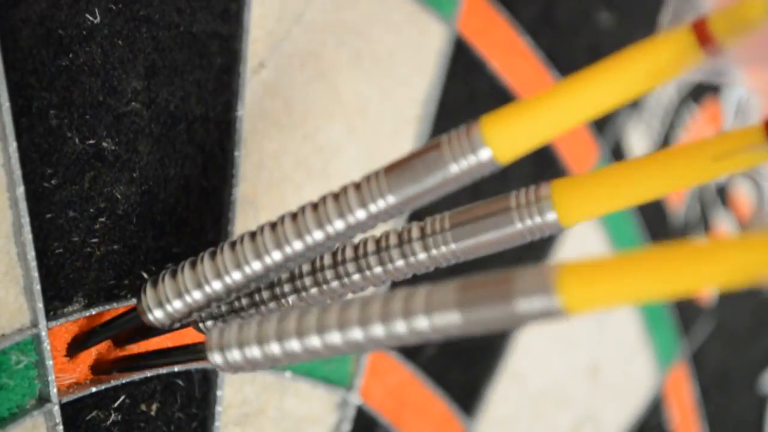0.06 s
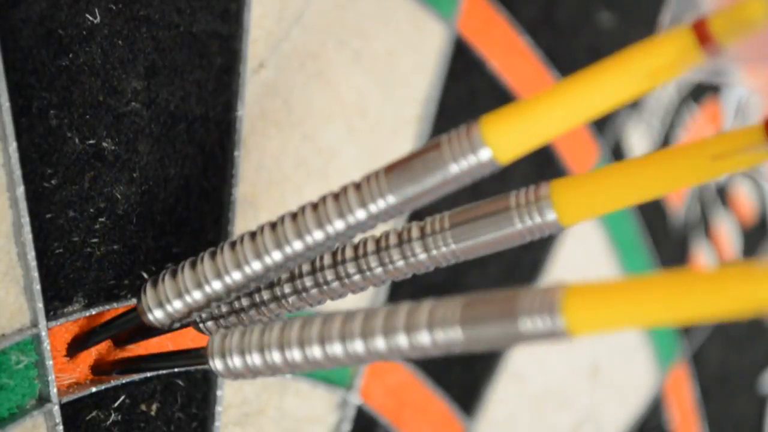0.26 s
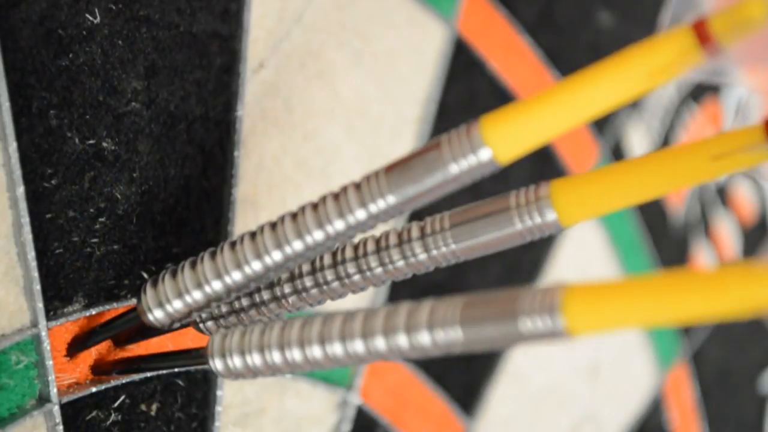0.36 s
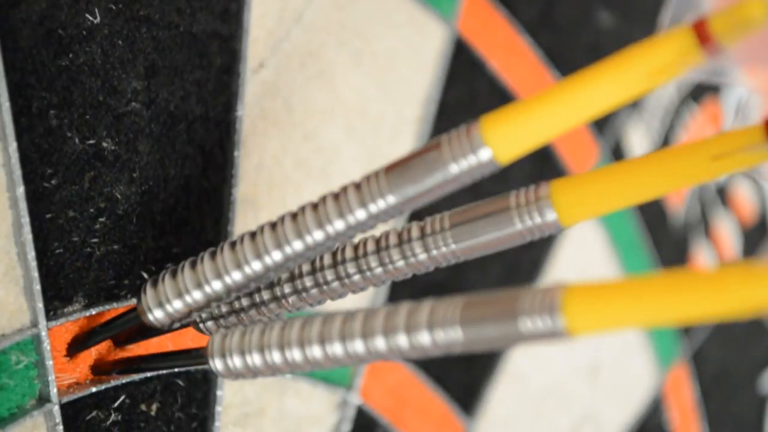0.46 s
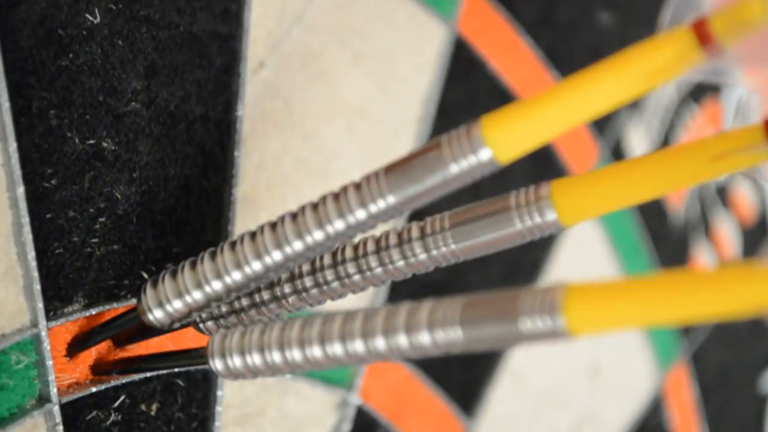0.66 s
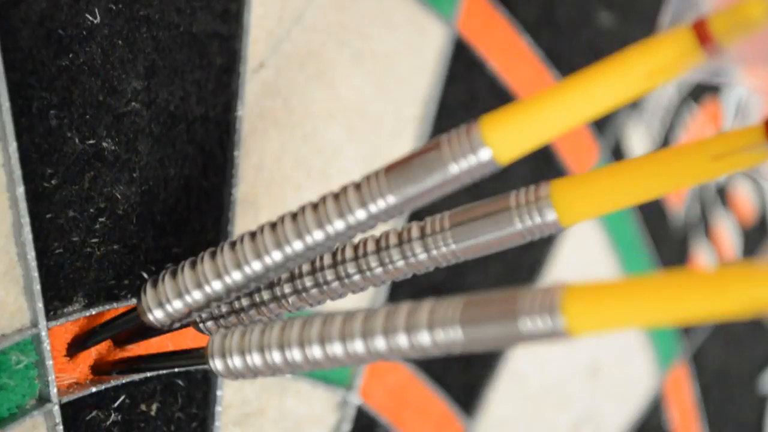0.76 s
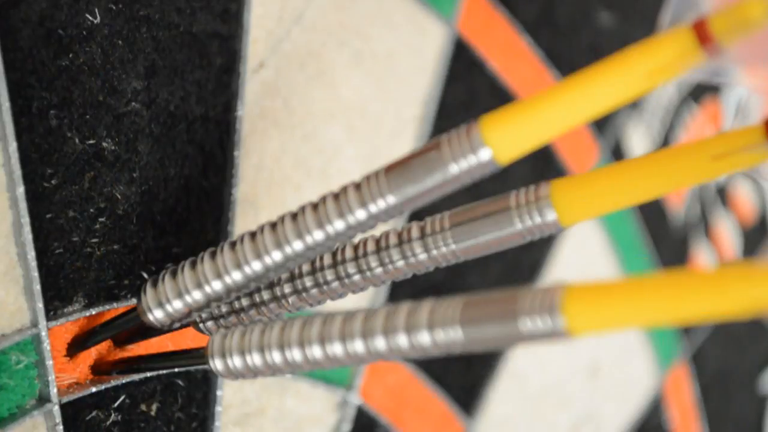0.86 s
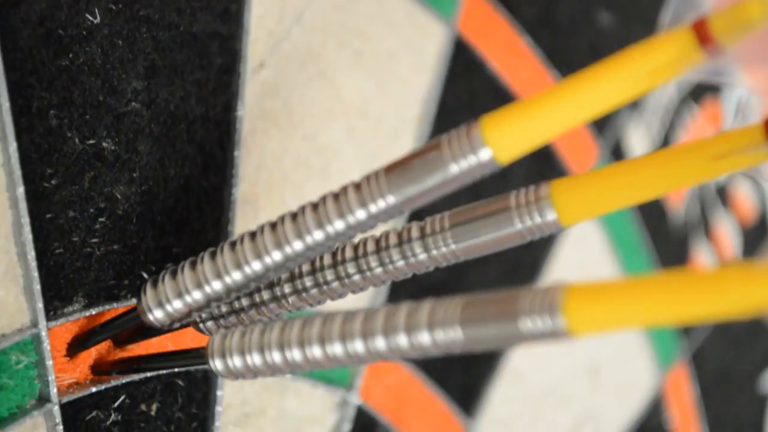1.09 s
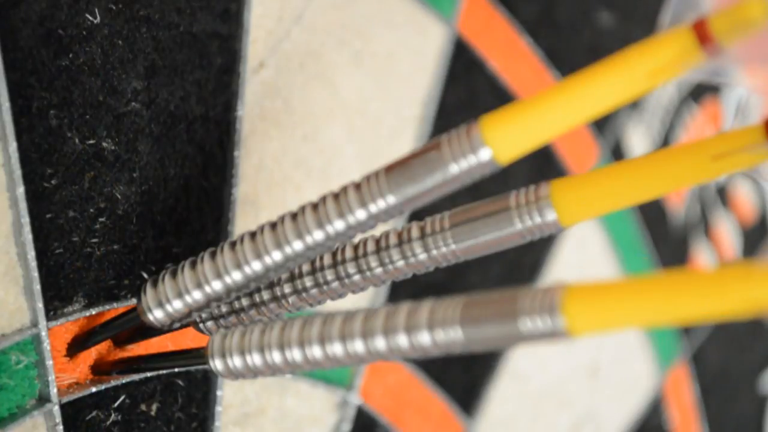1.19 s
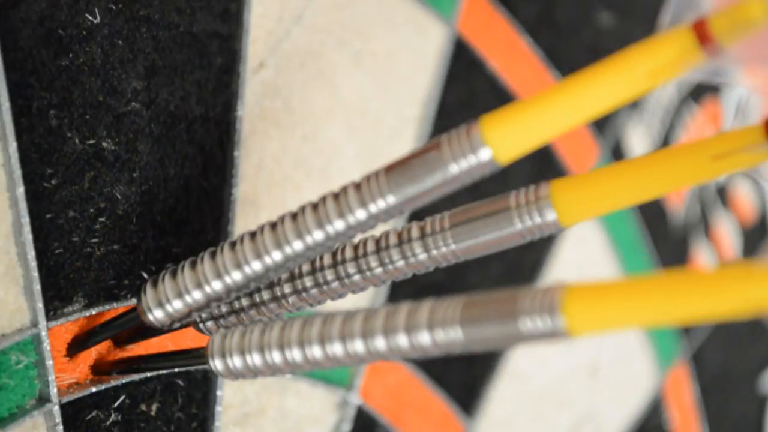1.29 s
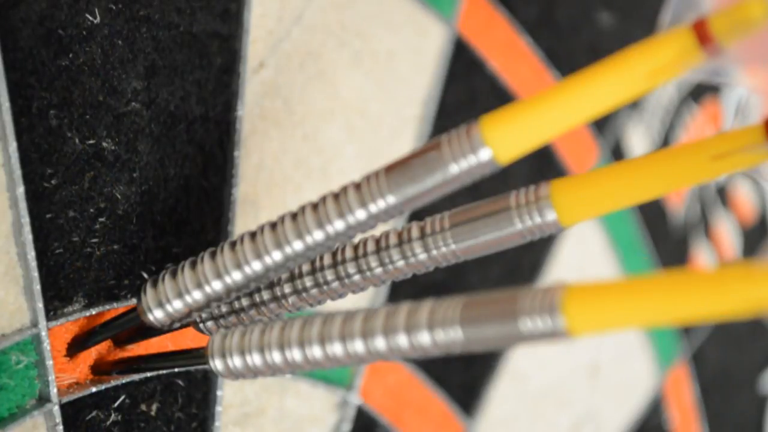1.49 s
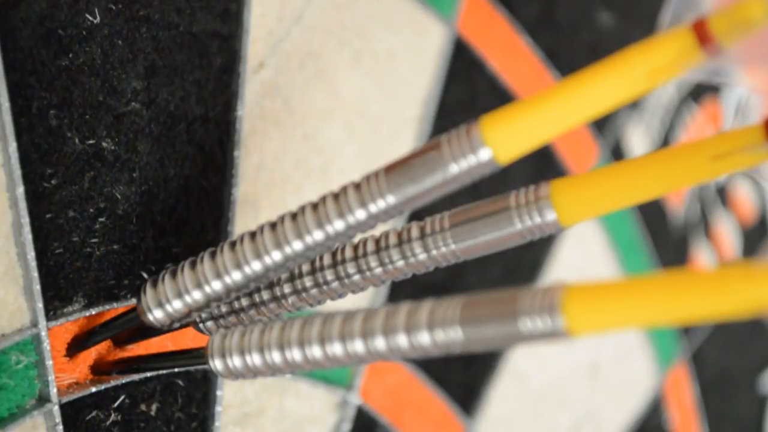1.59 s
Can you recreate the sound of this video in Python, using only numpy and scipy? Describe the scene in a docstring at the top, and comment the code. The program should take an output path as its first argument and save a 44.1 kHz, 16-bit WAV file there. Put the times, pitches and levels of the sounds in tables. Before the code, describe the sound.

A steel-tipped dart thuds sharply into a bristle dartboard beside other darts, then near silence

```python
"""Dart into a bristle board

Small room, microphone right beside the board: a steel-tipped dart lands and overloads the microphone.
The point crunches in (shaped noise) and the barrel clatters on darts already there (ringing modes).
The board knocks, its mount answers late with a hollow thud, and the room reflects the hit (fading noise).
Behind it lie a low wavering hum (sines), room hiss, and faint handling taps and thin chirps (noise puffs)."""
import sys
import numpy as np
from scipy import signal
from scipy.fft import rfft, irfft
from scipy.io import wavfile

SR = 44100
rng = np.random.default_rng(int(sys.argv[2]) if len(sys.argv) > 2 else 0)


def wav_record(signal):
    """Record a signal, one row per channel, as 16-bit PCM in the file named by sys.argv[1]."""
    frames = np.transpose(np.atleast_2d(signal))
    bounded = np.clip(frames, -1, 1)
    # unit amplitude maps onto the largest positive 16-bit level
    quanta = np.round(bounded * 32767).astype(np.int16)
    wavfile.write(sys.argv[1], SR, quanta)


N = 72765
TIME = np.arange(N) / SR


def from_db(db):
    """Decibels to gain."""
    return 10 ** (np.asarray(db) / 20)


def rms_one(x):
    """Scale to unit rms."""
    return x / np.sqrt(np.mean(x ** 2) + 1e-20)


def at_hz(points, hz):
    """Read a spectrum table on a log-frequency axis."""
    table_hz, value = np.transpose(points)
    return np.interp(np.log(hz), np.log(table_hz), value)


def level_over_time(points):
    """Gain along the scene, straight in dB between the points."""
    return from_db(np.interp(TIME, *np.transpose(points)))


def drift(rate_hz):
    """Slow random motion with spread near 1: white noise through two equal one-pole low-passes."""
    r = np.exp(-2 * np.pi * rate_hz / SR)
    slow = signal.lfilter([1], [1, -2 * r, r * r], rng.standard_normal(2 * N))
    return rms_one(slow[N:])  # the first half lets the filter settle


def noise_bands():
    """Third-octave bands of white noise: (centre Hz, band)."""
    edges = 1000 * 2 ** (np.arange(-16, 14) / 3)
    white = rng.standard_normal((2, 2 * N))  # neighbouring bands take different noise
    for k, (low, high) in enumerate(zip(edges, edges[1:])):
        band_pass = signal.butter(2, [low, high], "band", fs=SR, output="sos")
        yield np.sqrt(low * high), signal.sosfilt(band_pass, white[k % 2])[N:]


def coloured(spectrum):
    """Steady noise with a given spectrum; rms 1."""
    hz = np.maximum(np.arange(N // 2 + 1) * SR / N, 1)
    shaped = rfft(rng.standard_normal(N)) * from_db(at_hz(spectrum, hz))
    return rms_one(irfft(shaped, N))


def since(s):
    """Time since a moment, zero before it."""
    return np.maximum(TIME - s, 0)


def burst(s, attack_s, decay_s):
    """Envelope with a straight rise and an exponential fall to 1/e per decay time."""
    return np.minimum(since(s) / attack_s, 1) * np.exp(-since(s + attack_s) / decay_s)


def strike(s, modes, spread_db=0):
    """One blow sets every mode ringing, its strength varied at random by spread_db."""
    t = since(s)
    ring = np.zeros(N)
    for hz, db, t60 in modes:
        strength_db = db + spread_db * rng.standard_normal()
        ring += from_db(strength_db - 60 * t / t60) * np.cos(2 * np.pi * hz * t)
    return (t > 0) * ring


def puffs(rows, width):
    """Small soft sounds: noise passed twice through a resonance; width is bandwidth / centre per pass."""
    out = np.zeros(N)
    for s, db, hz, attack_s, decay_s in rows:
        b, a = signal.iirpeak(hz, 1 / width, fs=SR)
        once = signal.lfilter(b, a, rng.standard_normal(N))
        puff = signal.lfilter(b, a, once)
        out += from_db(db) * burst(s, attack_s, decay_s) * rms_one(puff)
    return out


# colour of the room hiss: (frequency [Hz], relative level per Hz [dB])
HISS_SPECTRUM = [(25, 2), (60, 11), (150, 4.5), (300, -1), (700, -2.5), (1400, -3), (2800, -6),
                 (5500, -10.5), (8000, -11), (10500, -11.5), (15500, -18)]
# loudness of the hiss at the microphone: (time [s], level [dB])
HISS_LEVEL = [(0, -60.5), (.7, -60.5), (1.15, -59), (1.45, -61), (1.65, -57.5)]
HISS_FLICKER_DB = 1.5


def air():
    """Quiet room hiss: noise whose level flickers separately in every band."""
    hiss = np.zeros(N)
    for hz, band in noise_bands():
        band_db = at_hz(HISS_SPECTRUM, hz) + HISS_FLICKER_DB * drift(13)
        hiss += from_db(band_db) * band
    return level_over_time(HISS_LEVEL) * rms_one(hiss)


# partials of the low hum: (frequency [Hz], relative level [dB])
HUM_PARTIALS = [(104, 0.5), (208, -12)]
# loudness of the hum at the microphone: (time [s], level [dB])
HUM_LEVEL = [(0, -51.5), (.07, -60.5), (.14, -57.5), (.3, -64), (.68, -60), (.85, -60), (1.15, -62),
             (1.33, -58), (1.49, -62.5), (1.59, -56), (1.65, -63)]
HUM_WAVER_DB, HUM_WANDER = 2.17, 0.038  # rms level waver; rms pitch wander as a share of the frequency
HUM_WAVER_HZ = 11  # low-pass corner of both motions


def hum():
    """A low hum: sines share one wandering pitch, while each wavers in level by itself."""
    turns = 2 * np.pi * np.cumsum(1 + HUM_WANDER * drift(HUM_WAVER_HZ)) / SR  # phase for 1 Hz
    tone = np.zeros(N)
    for hz, db in HUM_PARTIALS:
        tone += from_db(db + HUM_WAVER_DB * drift(HUM_WAVER_HZ)) * np.sin(hz * turns)
    return level_over_time(HUM_LEVEL) * rms_one(tone)


# thin, very faint chirps: (time [s], level [dB], centre [Hz], attack [s], decay time [s])
FAINT_CHIRPS = [(.01, -65, 3860, 0.014, 0.071), (.186, -60.5, 4830, 0.0046, 0.0076),
                (.48, -61.5, 2595, 0.023, 0.051)]


def chirps():
    """Narrow noise puffs, thin enough to suggest a pitch."""
    return puffs(FAINT_CHIRPS, width=0.11)


# faint handling taps and rustles: (time [s], level [dB], centre [Hz], attack [s], decay time [s])
HANDLING_TAPS = [(.942, -47, 1730, 0.0012, 0.0045), (.9425, -60.5, 3200, 0.00049, 0.0025),
                 (.968, -60.5, 1966, .003, .015), (1.095, -57, 1300, 0.0034, 0.03),
                 (1.10, -65, 2600, .01, 0.035), (1.158, -60, 10640, .003, .01),
                 (1.159, -56.5, 857, 0.0036, 0.018), (1.238, -58.5, 900, 0.0038, 0.052),
                 (1.24, -62.5, 398, 0.002, .12), (1.58, -60.5, 2150, 0.0041, 0.013)]


def taps():
    """Broad noise puffs, heard as soft taps and rustles."""
    return puffs(HANDLING_TAPS, width=0.71)


# strength of the small room's reflections: (frequency [Hz], reflected level [dB])
ROOM_LEVEL = [(60, -0.5), (150, -11), (250, -4.5), (310, -9.5), (420, -5.5), (620, -9.5), (780, -11.5),
              (1000, -5), (2000, -9), (3200, -8.5), (4700, -13.5), (7000, -13), (10500, -11),
              (13000, -22.5), (16000, -20)]
# how long the room rings: (frequency [Hz], time to fall 60 dB [s])
ROOM_T60 = [(60, .55), (400, 0.48), (1500, .39), (3300, 0.36), (4700, .41), (6200, 0.33), (8000, 0.32),
            (11000, .25), (15000, .2)]
ROOM_DELAY_S, ROOM_BUILD_S = .004, 0.0043


def room(x):
    """Diffuse reflections: noise bands that build up quickly and mostly die sooner in the treble."""
    response = np.zeros(N)
    for hz, band in noise_bands():
        decay_s = at_hz(ROOM_T60, hz) / np.log(1000)
        fade = burst(ROOM_DELAY_S, ROOM_BUILD_S, decay_s)
        response += from_db(at_hz(ROOM_LEVEL, hz)) * band * fade / np.linalg.norm(fade)
    return signal.fftconvolve(x, response)[:N]


def reflections(thud, count=3):
    """The dart sends a slightly different crunch towards each wall, so the tail is smooth."""
    return sum(room(dart() + thud) for _ in range(count)) / np.sqrt(count)


# resonances of the mount behind the board: (frequency [Hz], level before swell [dB], t60 [s])
MOUNT_RESONANCES = [(423.4, -4, .036), (464, -21.5, .04)]
MOUNT_S, MOUNT_SWELL_S = .2285, .006


def mount():
    """The mount behind the board answers late, its ringing modes swelling into a hollow thud."""
    swell = 1 - np.exp(-(since(MOUNT_S) / MOUNT_SWELL_S) ** 2)
    return swell * strike(MOUNT_S, MOUNT_RESONANCES)


# the board takes the blow and rebounds: (time [s], level [dB])
BLOWS = [(.2208, 1), (.2273, -7)]
# resonances of the board: (frequency [Hz], level relative to the blow [dB], t60 [s])
BOARD_RESONANCES = [(140, -28.5, .05), (266, -31.5, .07), (763.3, -20, 0.037), (924, -18, .035),
                    (1047, -23, 0.046), (1456, -21, .025), (1794, -14.5, 0.021), (2142, -26, 0.065)]


def board():
    """Each blow makes the board knock as a set of short ringing modes."""
    return sum(from_db(db) * strike(s, BOARD_RESONANCES) for s, db in BLOWS)


# the point goes in and the barrel chatters on its neighbours:
# (time [s], relative level [dB], decay time of the crunch [s])
DART_CONTACTS = [(.2180, -15, .003), (0.219, 3, .0022), (0.2222, -2.5, .0014), (0.226, -5.5, .0035),
                 (0.2297, -3, .0026), (0.2331, -6, .002), (0.2377, -16.5, .002)]
# crunch of fibres and ribbed metal: (frequency [Hz], relative level per Hz [dB])
CRUNCH_SPECTRUM = [(100, -19), (300, -12.5), (600, -11), (850, -5.5), (1200, -6.5), (1850, -3),
                   (3000, -11.5), (4600, 0.5), (6000, -6), (8700, 1.5), (11200, -2), (12100, -14),
                   (16000, -18.5)]
# resonances of barrel and shaft: (frequency [Hz], relative level [dB], t60 [s])
DART_RESONANCES = [(4450, -19.5, .07), (4875, -25.5, .06), (6945, -25, 0.097), (7171, -17, .05),
                   (8194, -24, .05), (8553, -22.5, 0.081), (8872, -24.5, .06), (9255, -28, .07),
                   (9780, -13, 0.038), (11100, -20.5, .06), (11040, -26.5, 0.05926)]
CONTACT_ATTACK_S, CONTACT_JITTER_S = 0.00049, .00005
CRUNCH_DB, RING_DB, RING_SPREAD_DB = -4.5, -5.5, 1.5


def dart():
    """Each contact is a short noise crunch and an impulse that rings the barrel and shaft."""
    force = np.zeros(N)
    clicks = np.zeros(N)
    for s, db, decay_s in DART_CONTACTS:
        force += from_db(db) * burst(s, CONTACT_ATTACK_S, decay_s)
        click_s = s + CONTACT_JITTER_S * rng.standard_normal()
        clicks[int(click_s * SR)] += from_db(db)
    ring = signal.fftconvolve(clicks, strike(0, DART_RESONANCES, RING_SPREAD_DB))[:N]
    crunch = force * coloured(CRUNCH_SPECTRUM)
    return from_db(CRUNCH_DB) * crunch + from_db(RING_DB) * ring


def scene():
    """The close hit and its reflections over small sounds, hum and hiss."""
    thud = board() + mount()
    hit = dart() + thud + reflections(thud)
    background = taps() + chirps() + hum() + air()
    return (hit + background)[None]


OVERLOAD = .58  # amplitude the microphone cannot pass
LOW_CUT_HZ, CUTOFF_HZ = 32, 15900


def record(dry):
    """The microphone flattens peaks near its overload limit; deep bass and the top are cut."""
    fine = signal.resample_poly(dry, 4, 1, axis=-1)  # finer steps limit aliasing
    limited = fine / (1 + (fine / OVERLOAD) ** 6) ** (1 / 6)
    clipped = signal.resample_poly(limited, 1, 4, axis=-1)
    low_cut = signal.butter(1, LOW_CUT_HZ, "high", fs=SR, output="sos")
    thinned = signal.sosfilt(low_cut, clipped)
    top_cut = signal.firwin(201, CUTOFF_HZ, window="blackman", fs=SR)
    return signal.fftconvolve(thinned, top_cut[None], "same")


dry = scene()
out = record(dry)
wav_record(out)
```